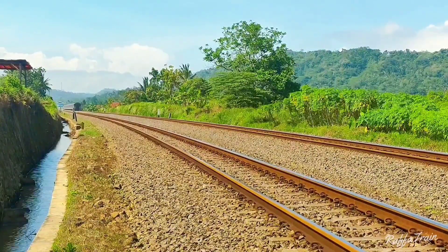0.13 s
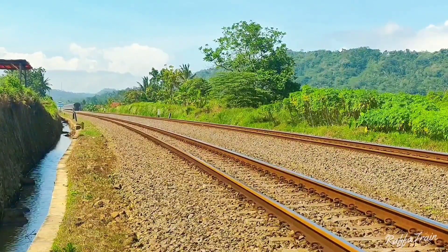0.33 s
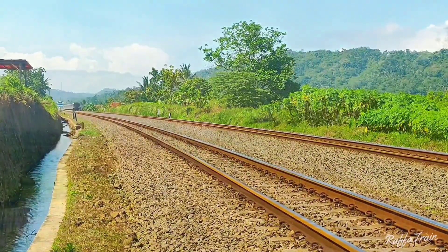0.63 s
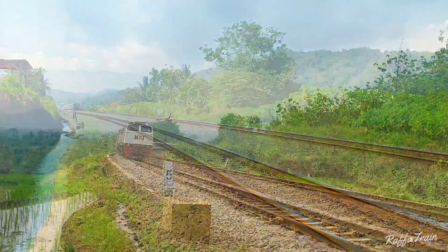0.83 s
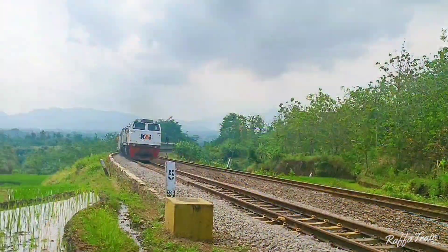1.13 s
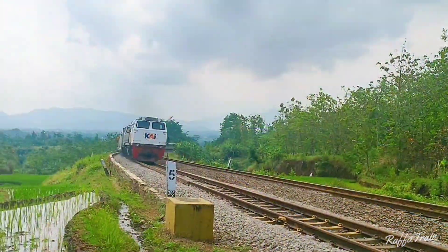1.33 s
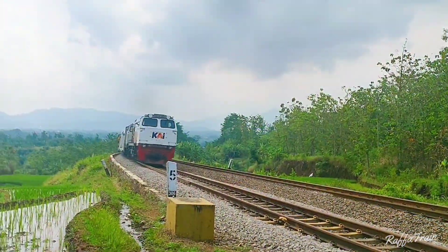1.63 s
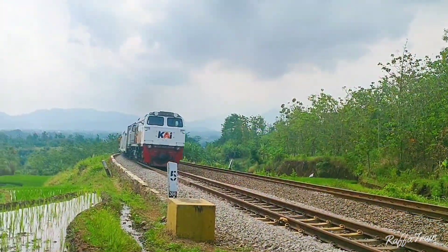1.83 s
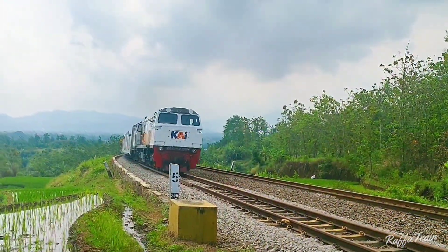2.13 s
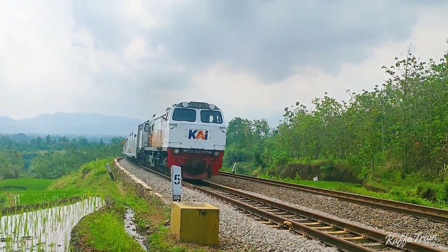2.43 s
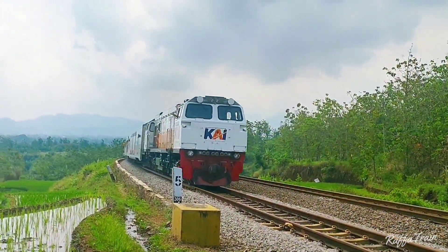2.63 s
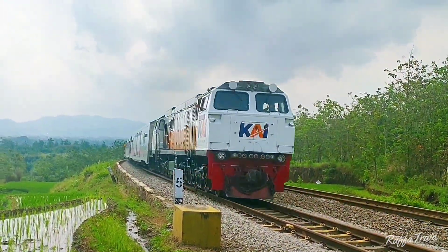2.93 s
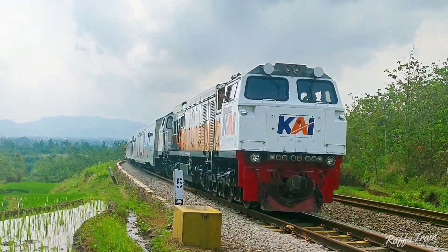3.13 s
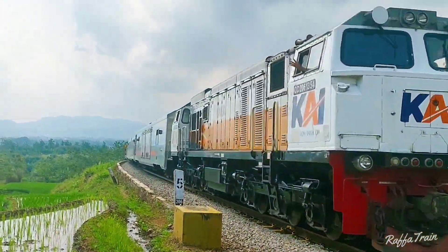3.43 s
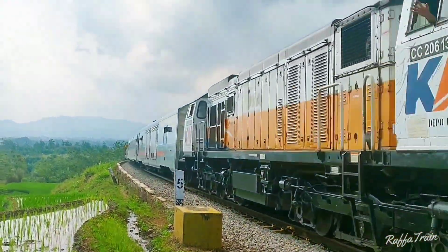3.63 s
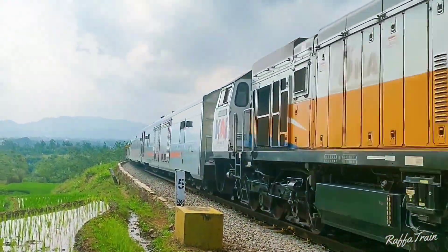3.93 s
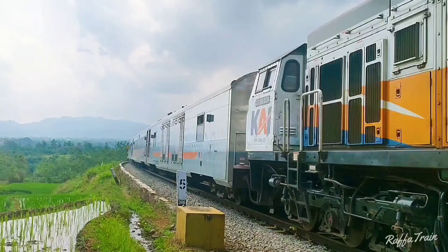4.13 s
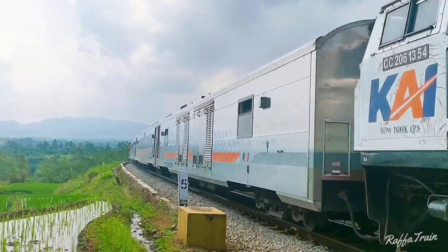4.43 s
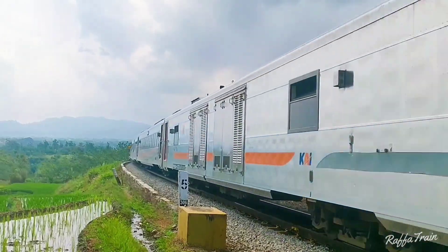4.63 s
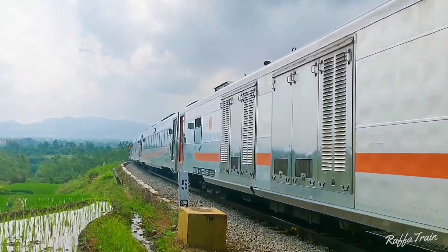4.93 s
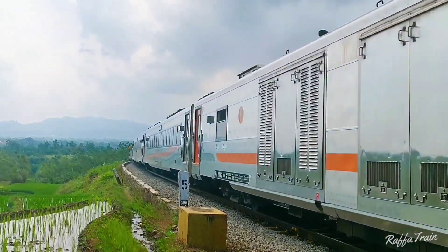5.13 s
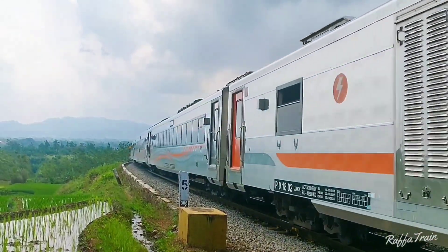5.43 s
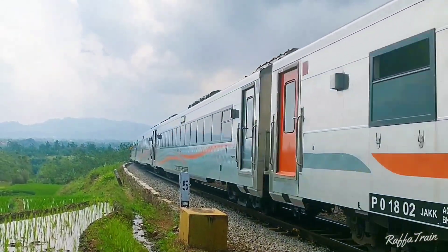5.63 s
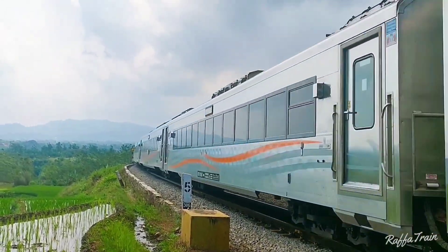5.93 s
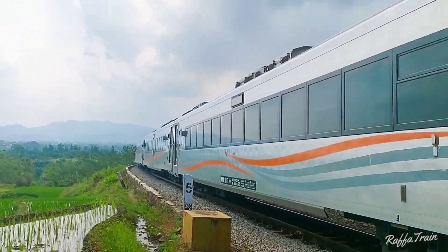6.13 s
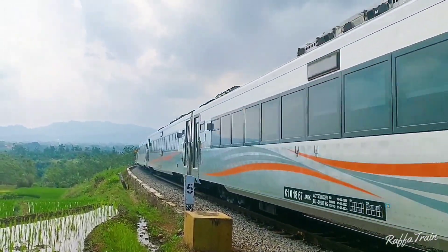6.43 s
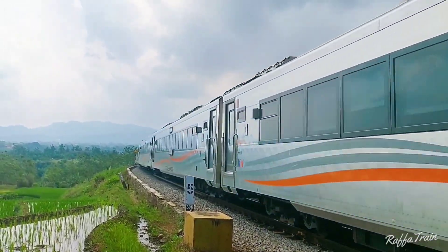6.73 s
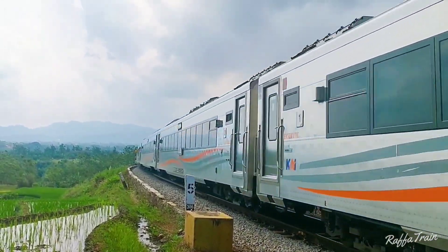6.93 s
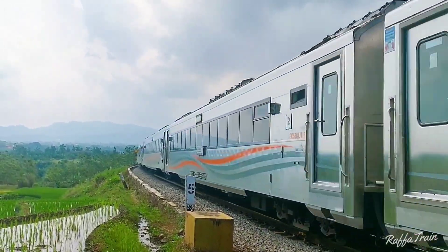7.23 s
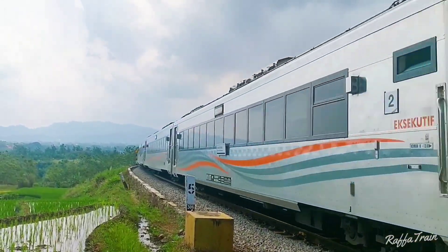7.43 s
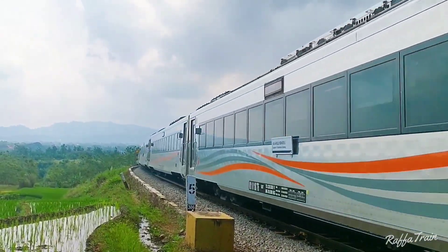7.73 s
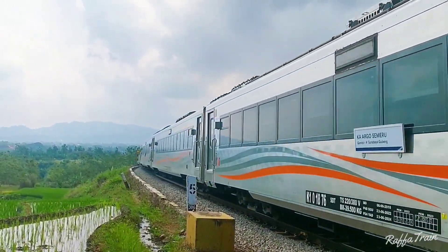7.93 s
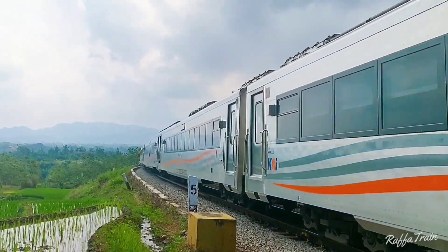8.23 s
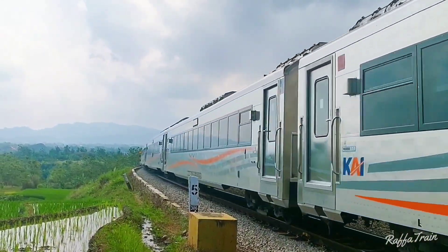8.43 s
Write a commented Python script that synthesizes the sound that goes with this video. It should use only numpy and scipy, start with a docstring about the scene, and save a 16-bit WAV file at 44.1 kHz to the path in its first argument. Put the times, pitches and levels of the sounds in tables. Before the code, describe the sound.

A diesel train sounds one two-note horn blast, throbs past up close, and its coaches clatter over rail joints.

```python
"""Diesel train on a country line

One microphone in open fields, 4.5 m from the track, with a wooded bank answering. A passenger train comes
up and sounds one blast on its two-bell air horn. The exhaust throbs and drops in pitch as it passes, the
turbocharger whistles, a generator car hums by, then the coaches roll past at close range, their wheels
knocking and clanging over the rail joints."""
import sys
import numpy as np
from scipy import signal
from scipy.fft import rfft, irfft, next_fast_len
from scipy.io import wavfile
from scipy.ndimage import uniform_filter1d, map_coordinates

SR = 44100
rng = np.random.default_rng(int(sys.argv[2]) if len(sys.argv) > 2 else 0)


def wav_out(sig):
    """Save sig, one row per channel (or a flat mono array), as 16-bit PCM at SR to the path in sys.argv[1]."""
    wavfile.write(sys.argv[1], SR, np.round(np.clip(np.atleast_2d(sig).T, -1, 1) * 32767).astype(np.int16))


N = 377937

# Noise colours: f/Hz, relative level/dB per Hz
FIELD_SPECTRUM = [(15, -43), (25, -21), (76, -1), (134, -0.5), (349, -13.5), (386, -18), (756, -9.5),
                  (2420, -23), (3300, -36), (3750, -57), (5250, -51), (5820, -37.5), (8150, -38),
                  (9270, -56), (12000, -62), (15600, -94), (22000, -120)]  # open country
RUMBLE_SPECTRUM = [(15, -45), (26, -17), (35, -12), (44, -14), (58, -9), (76, -4), (100, 1.5), (140, 12.5),
                   (190, -6), (265, 3), (330, -40), (450, -57.5)]  # ground
ROAR_SPECTRUM = [(94, -34), (160, -1.5), (178, -2), (264, -8.5), (302, -2), (889, -14), (1030, -26.5),
                 (1120, -21.5), (1600, -30.5), (2080, -29.5), (3520, -120)]  # sleepers
RAIL_SPECTRUM = [(530, -82), (900, -14), (996, 7), (1100, -8), (1280, -15), (1760, -3.5), (2100, -1),
                 (2420, -0.5), (3680, -13.5), (4500, -37), (5850, -52), (9900, -120)]  # rails
RASP_SPECTRUM = [(880, -42), (1500, -1), (1960, -14), (2430, 0), (2790, -17), (3200, -26), (4470, -33),
                 (6430, -38), (8900, -12), (10200, -35), (15700, -41)]  # air torn by the horn's diaphragms
HISS_SPECTRUM = [(2240, -2), (3800, -11), (5210, -5), (6450, 3), (6890, 3), (7570, -0.5), (8530, -0.5),
                 (9780, -8.5), (11700, -11), (12600, -18), (14900, -14), (15700, -17)]  # wheel rubbing on rail
CLANG_SPECTRUM = [(350, 7), (600, 9), (800, 17), (1240, 4.5), (1660, 6.5), (2080, 14.5), (3780, -11),
                  (4830, -3), (5300, -37.5), (5760, -29), (7000, -25), (9100, -44), (15400, -120)]  # wheel and bogie
GAS_SPECTRUM = [(40, -41), (90, -22), (130, 7), (190, 7), (270, -6.5), (340, -9.5), (800, -11),
                (2000, -86)]
DRONE_SPECTRUM = [(22, -31), (36, -10), (55, -11), (170, -20), (265, 4), (340, -20.5), (500, -9.5),
                  (750, -25), (1300, -22), (2000, -43), (5000, -54)]
SNAP_SPECTRUM = [(400, -6), (2300, -4.5), (3800, -21.5), (7000, -6), (12000, -21)]
# Exhaust tones: multiple of the cycle rate, relative level/dB
EXHAUST_ORDERS = [(3, -35), (4, -12.5), (5, -32), (6, -38), (7, -37), (8, -55), (9, -28), (10, -36),
                  (11, 3), (12, 3.5), (13, -21), (14, -9), (15, -9), (16, -6), (17, 2), (18, -8.5),
                  (19, -21), (20, -15), (21, -7), (22, -39), (23, -22), (24, -10.5), (25, -11.5),
                  (26, -11.5), (27, -24), (28, -13.5), (29, -12), (30, -15), (31, -21)]
# Exhaust at the microphone: t/s, level/dB
EXHAUST_LEVEL = [(.5, -33), (1.15, -26), (1.6, -24), (2.4, -23.5), (2.9, -21.5), (3.3, -22.5), (3.55, -26),
                 (4.45, -17.5), (4.8, -27), (5.3, -26.5), (5.8, -22.5), (7.0, -28.5), (8.57, -37)]
# Engine-room swell, on top of its change with distance: t/s, level/dB
DRONE_SWELL = [(2.4, -9.5), (3.0, -0.5), (3.45, 0), (4.0, -1.5), (4.6, -1), (5.3, 7), (5.8, -2.5)]
# Horn bells at full pressure: harmonic, relative level/dB
LOW_BELL = [(1, -30.5), (2, -24.5), (3, -29.5), (4, -25.5), (5, -36.5), (6, -42.5), (7, -44.5), (8, -34),
            (9, -49), (10, -49), (11, -56), (12, -49), (13, -57), (14, -48), (15, -51), (16, -52),
            (17, -51), (18, -48), (19, -46), (20, -43.5), (21, -43), (22, -52), (23, -52), (24, -46),
            (25, -53), (26, -46.5), (27, -48.5), (28, -49), (29, -55), (30, -55.5), (31, -62)]
HIGH_BELL = [(1, -37), (2, -28.5), (3, -34), (4, -42), (5, -42.5), (6, -51), (7, -48), (8, -54), (9, -54),
             (10, -72), (11, -53), (12, -49), (13, -46), (14, -46.5), (15, -44), (16, -56), (17, -61),
             (18, -61)]
# Course of the high bell's first partial, and lift of its third: t/s, level/dB
HIGH_FUNDAMENTAL = [(.78, -35), (1.0, -40), (1.3, -32), (1.62, -25), (1.78, -31)]
HIGH_THIRD_LIFT = [(.76, 0), (.87, 8), (.93, -14), (1.02, 2), (1.32, 2.5), (1.5, 5), (1.56, -7)]
# Colouring of the horn's rough sum and difference tones: f/Hz, level/dB
MIXING_COLOUR = [(600, -46), (1100, -16), (2500, -1), (4200, -29), (6500, 0), (8700, 1.5), (10500, -16)]
# Echo decay of the wooded bank: f/Hz, t60/s
BANK_DECAY = [(150, 0.99), (1000, 1), (8000, 0.94)]
# Flanges grazing the rail: t/s, level/dB, length/s
FLANGE_GRAZES = [(3.41, -37, 0.19), (3.808, -27, 0.0097), (4.028, -28, 0.022), (4.362, -36, 0.013),
                 (4.44, -26.5, 0.018), (5.025, -31, 0.013), (5.137, -26, 0.016), (5.17, -31.5, 0.26),
                 (5.352, -28, .014), (6.148, -31, 0.055), (6.36, -30, 0.032)]
# Wheels on joints, far ones dull, near ones clanging: t/s, knock/dB, clang/dB, knock f/Hz, length/s
JOINT_STRIKES = [(3.471, -21, -31, 504, 0.0064), (3.597, -24, -37, 263, 0.014),
                 (3.709, -26, -43, 262, 0.018), (3.928, -15.5, -52, 253, 0.018),
                 (4.185, -16, -42, 200, 0.031), (4.657, -14.5, -39, 267, 0.013),
                 (4.694, -19, -27.5, 386, 0.005), (5.124, -24, -25, 463, 0.026),
                 (5.184, -13.5, -34, 253, 0.018), (5.246, -17, -28, 234, 0.037),
                 (5.343, -21, -28.5, 480, 0.038), (5.414, -20, -43, 313, .02),
                 (5.541, -20.5, -32, 256, 0.015), (5.659, -19, -22.5, 480, 0.016),
                 (5.794, -20.5, -21.5, 450, 0.023), (5.953, -15.5, -37, 277, 0.022),
                 (6.091, -23, -42, 255, 0.032), (6.191, -14.5, -29.5, 290, 0.0092),
                 (6.335, -20.5, -31, 314, 0.024), (6.413, -14, -29.5, 295, 0.012),
                 (6.551, -15.5, -24.5, 283, 0.023), (6.645, -16.5, -44, 283, 0.01),
                 (6.71, -22, -21.5, 350, 0.02), (6.796, -16.5, -41, 383, 0.0072),
                 (7.02, -18, -24.5, 456, 0.019), (7.164, -19, -22.5, 510, 0.026),
                 (7.318, -14.5, -29, 255, 0.025), (7.464, -13.5, -35, 252, 0.02),
                 (7.563, -13.5, -34.5, 315, .014), (7.702, -16.5, -38, 288, .02),
                 (7.775, -14, -30.5, 253, 0.022), (7.929, -15.5, -25.5, 400, 0.023),
                 (8.016, -13.5, -47, 287, 0.016), (8.078, -18.5, -21, 485, 0.02),
                 (8.164, -13.5, -31, 260, 0.012), (8.388, -17, -23, 430, 0.022),
                 (8.53, -18, -21.5, 456, 0.022)]
# Modes of a steel wheel: f/Hz, relative level/dB, t60/s
WHEEL_MODES = [(514, 6, 0.12), (757, 3.5, 0.093), (1957, -0.5, 0.13), (2148, -8.5, 0.074), (2330, 2, .12),
               (2540, -9, 0.19)]

# Passing sources: abreast t/s, base level/dB, loss/dB per doubling of distance
TURBO, GEARS = (4.53, -33, 4), (4.3, -33.5, 3.5)
ENGINE_ROOM, GENERATOR = (3.98, -18, 5.2), (4.78, -25, 3.3)
# Wheel noise: arrival t/s, base level/dB, loss/dB per doubling of distance before, loss/dB per s after
RUMBLE, ROAR = (2.5, -25.5, 3.5, 1.5), (3.5, -20.5, 7, 1.07)
RAIL, HISS = (4, -32, 5, 1.38), (4.5, -29, 4.5, 2.5)

SPEED_M_PER_S, TRACK_M, SOUND_M_PER_S = 14.06, 4.5, 343
CYCLE_HZ, ENGINE_PASS_S = 8.765, 4.38  # four-stroke cycle rate; stack abreast of the microphone
LOW_HZ, HIGH_HZ = 296.5, 431.7  # the horn's bells
CATCH_S, SHUT_S, STALL_S = .745, 1.52, 1.78  # the bells catch, the valve shuts, the diaphragms stall
FILL_S, BLEED_S = .1, .088  # how slowly the horn's pipe fills and empties
ATTACK_DB_PER_S, RELEASE_DB_PER_S = 698, 99.5
HIGH_LEAD_S, HIGH_LAG_S = .024, .07  # the high bell catches first and keeps its air longer


def amp(db):
    """Decibels to gain."""
    return 10 ** (np.asarray(db) / 20)


def unit(x):
    """Scaled to rms 1."""
    return x / np.sqrt(np.mean(x ** 2) + 1e-20)


def seconds(size=N):
    """The time of each sample."""
    return np.arange(size) / SR


def along(points, hz):
    """A table read on a log frequency axis."""
    f, values = np.transpose(points)
    return np.interp(np.log(hz + 1), np.log(f + 1), values)


def curve(points, size=N):
    """A table over time, read at every sample."""
    return np.interp(seconds(size), *np.transpose(points))


def wobble(rate, size=N):
    """A smooth random curve, rate knots a second."""
    coarse = np.arange(0, size + 16, 16)
    knots = rng.standard_normal(int(size * rate / SR) + 4)
    return np.interp(np.arange(size), coarse, map_coordinates(knots, [coarse * rate / SR]))


def filtered(x, response):
    """x through a response given as gain against frequency."""
    m = next_fast_len(len(x) + SR // 5)
    return irfft(rfft(x, m) * response(np.fft.rfftfreq(m, 1 / SR)), m)[:len(x)]


def noise(spectrum, size=N, patchy_db=0):
    """Coloured noise of rms 1, with optional patches of random gain in time and frequency."""
    white = rng.standard_normal(size)
    if patchy_db:
        z = signal.stft(white, nperseg=512)[2]
        patches = uniform_filter1d(uniform_filter1d(rng.standard_normal(z.shape), 4, 0), 10, 1)
        white = signal.istft(z * amp(patchy_db * unit(patches)), nperseg=512)[1][:size]
    return unit(filtered(white, lambda hz: amp(along(spectrum, hz))))


def phase_of(hz):
    """Running phase of a moving frequency."""
    return 2 * np.pi * np.cumsum(hz) / SR


def blow(t, rise, t60, hold=0):
    """A swell, a short hold and an exponential fall, peak 1."""
    rise = max(rise, .002)
    return np.minimum(t / rise, 1) * amp(-60 * np.maximum(t - rise - hold, 0) / t60)


def distance(abreast_s):
    """Metres from the microphone to a point of the train."""
    return np.hypot(TRACK_M, SPEED_M_PER_S * (seconds() - abreast_s))


def doppler(abreast_s):
    """Pitch ratio at the microphone: high coming, low leaving."""
    return 1 / (1 + np.gradient(distance(abreast_s)) * SR / SOUND_M_PER_S)


def passing(abreast_s, db, fall_db):
    """Level in dB of one source going by the microphone."""
    return db - fall_db * np.log2(distance(abreast_s) / TRACK_M)


def procession(arrive_s, db, fall_db, ease_db):
    """Level in dB of the row of wheels: it grows as the first ones near, then eases along the coaches."""
    since = seconds() - arrive_s
    return np.where(since < 0, passing(arrive_s, db, fall_db), db - ease_db * since)


def lull(first_s=5.58, coach_s=1.36, width_s=.095):
    """1 during a brief dip in the rolling noise, once per coach, just before a pair of clangs."""
    since = seconds() - first_s
    offset = since - coach_s * np.maximum(np.round(since / coach_s), 0)
    return np.exp(-(2 * offset / width_s) ** 2)


def open_country(db=-49.5):
    """The faint, steady rush of the fields around the microphone."""
    return amp(db) * noise(FIELD_SPECTRUM, patchy_db=3.5)


def exhaust():
    """Unequal cylinders repeat each cycle: a comb of tones and puffs of gas from the stack."""
    level_db = curve(EXHAUST_LEVEL)
    phase = phase_of(CYCLE_HZ * doppler(ENGINE_PASS_S) * (1 + .001 * wobble(12)))
    drift = [wobble(4) for _ in range(7)]  # the air path shifts the balance of the orders
    orders = sum(amp(db + 1.1 * drift[i % 7]) * np.sin(order * phase + rng.uniform(0, 2 * np.pi))
                 for i, (order, db) in enumerate(EXHAUST_ORDERS))
    puffs = unit(noise(GAS_SPECTRUM) * (1 + 1.25 * np.cos(4 * phase)) * (1 + .5 * np.cos(phase)))
    throb = 1 + .25 * np.cos(phase) + .28 * np.cos(4 * phase)
    return amp(level_db + .8 * wobble(14)) * unit((unit(orders) + amp(-12.5) * puffs) * throb)


def engine_room():
    """Engine and radiator fans drone through the louvres, throbbing with the cylinders."""
    drone = noise(DRONE_SPECTRUM, patchy_db=2)
    throb = 1 + .29 * np.cos(4 * phase_of(CYCLE_HZ * doppler(ENGINE_PASS_S)))
    return amp(passing(*ENGINE_ROOM) + curve(DRONE_SWELL)) * unit(drone * throb)


def rolling(knee_hz=450, near_s=4.5, dull_db_per_s=2):
    """Rough treads shake ground, sleepers and rails; loose gear makes the upper bands chatter together."""
    chatter = wobble(70)
    rumble = amp(procession(*RUMBLE) + 1.6 * wobble(12) - 7 * lull()) * noise(RUMBLE_SPECTRUM)
    roar_db = procession(*ROAR) + 1.54 * chatter + .73 * wobble(13) - 3.5 * lull()
    roar = amp(roar_db) * noise(ROAR_SPECTRUM, patchy_db=1.5)
    upper = filtered(roar, lambda hz: 1 - 1 / (1 + (hz / knee_hz) ** 4))
    upper_gain = amp(-dull_db_per_s * np.maximum(near_s - seconds(), 0))  # muffled at a distance
    roar += upper * (upper_gain - 1)
    rail_db = procession(*RAIL) + chatter + .67 * wobble(12) - 1.5 * lull()
    return rumble + roar + amp(rail_db) * noise(RAIL_SPECTRUM, patchy_db=2)


def bell(hz, harmonics, knee, tilt_db, gain_db, lifts_db, rasp_db):
    """One horn bell: a buzzing diaphragm whose overtones above the knee fade first as pressure falls."""
    size = len(hz)
    beat_hz = (3 * LOW_HZ - 2 * HIGH_HZ) * (1.025 + .025 * wobble(10, size))
    beat = np.cos(phase_of(beat_hz))  # the mistuned fifth shakes pitch and overtones
    phase = phase_of(hz * (1 + .0018 * beat + .0028 * wobble(200, size) + .001 * wobble(25, size)))
    # the air path to the microphone makes the partials waver
    flutter = [wobble(11, size) + .7 * wobble(70, size) + .5 * wobble(260, size) for _ in range(7)]
    tone = np.zeros(size)
    for i, (harmonic, db) in enumerate(harmonics):
        octaves = max(np.log2(harmonic / knee), 0)
        shake_db = 1.97 * (.7 + .2 * octaves) * flutter[i % 7] + .9 * octaves * beat
        partial_db = db + lifts_db.get(harmonic, 0) + tilt_db * min(octaves, 2) + shake_db
        tone += amp(partial_db) * np.sin(harmonic * phase + rng.normal(0, .6))
    opening = (1 + np.cos(phase)) ** 3  # air escapes once a cycle
    puffs = unit(noise(RASP_SPECTRUM, size) * opening * (1 + .25 * beat))
    return amp(gain_db) * (np.sqrt(2) * tone + amp(rasp_db + 2 * tilt_db) * puffs)


def horn(length_s=2.3, mixing_db=-21, squeak_s=.694):
    """Two bells on one valve, far up the line: a rough fifth, heard with sum and difference tones."""
    size = int(length_s * SR)
    t = seconds(size)
    blown_s = np.maximum(t - CATCH_S, 0)
    pressure = (1 - .22 * np.exp(-blown_s / FILL_S)) / (1 + np.exp((t - SHUT_S) / BLEED_S))
    release_db = RELEASE_DB_PER_S * np.maximum(t - STALL_S, 0)
    gate_db = lambda lead_s: ATTACK_DB_PER_S * np.minimum(t - CATCH_S + lead_s, 0) - release_db
    tilt_db = -14 * (1 - pressure)  # per octave
    # the pitch starts high, settles, then creeps sharp
    bend = 1 + .014 * np.exp(-blown_s / .04) + .006 * (t - (CATCH_S + SHUT_S) / 2)
    sizzle = [(harmonic, -70) for harmonic in range(32, 52)]
    build_db = 1.5 - 8.5 * np.exp(-blown_s / .13)
    low = bell(LOW_HZ * bend, list(LOW_BELL) + sizzle, knee=1.85, tilt_db=tilt_db,
               gain_db=gate_db(0) - 1.24, lifts_db={1: build_db, 2: build_db}, rasp_db=-46)
    high_lifts_db = {1: curve(HIGH_FUNDAMENTAL, size) - HIGH_BELL[0][1], 3: curve(HIGH_THIRD_LIFT, size)}
    high = bell(HIGH_HZ * bend, HIGH_BELL, knee=1.52, tilt_db=np.interp(t - HIGH_LAG_S, t, tilt_db),
                gain_db=gate_db(HIGH_LEAD_S) - 1, lifts_db=high_lifts_db, rasp_db=-47)
    chord = low + high
    mixed = filtered(pressure * low * high * chord, lambda hz: amp(along(MIXING_COLOUR, hz)))
    squeak_phase = phase_of(4 * LOW_HZ * bend * 1.012)  # a diaphragm squeals just before it catches
    spike = amp(-280 * np.abs(t - squeak_s))
    squeak = amp(-34.5) * (spike * np.sin(squeak_phase) + spike ** 2 * np.sin(2 * squeak_phase))
    return np.pad(chord + amp(mixing_db) * np.std(chord) * unit(mixed) + squeak, (0, N - size))


def bank_echo(x):
    """The wooded bank scatters a late answer back to the microphone."""
    hz, t, z = signal.stft(rng.standard_normal(SR), SR, nperseg=256)
    tail = signal.istft(z * amp(-60 * t / along(BANK_DECAY, hz)[:, None]), SR, nperseg=256)[1]
    return signal.fftconvolve(np.pad(x, (SR // 40, 0)), tail / np.linalg.norm(tail))[:N]


def rubbing(tick_db=-12, ticks_per_s=90):
    """Treads and flanges hiss and crush grit; the air swallows the top octave while the train is far."""
    graze_power = sum(amp(db) ** 2 * np.exp(-(2 * (seconds() - s) / length) ** 2)
                      for s, db, length in FLANGE_GRAZES)
    gain = np.sqrt(amp(procession(*HISS) - 1.5 * lull()) ** 2 + graze_power)
    hiss = noise(HISS_SPECTRUM, patchy_db=2.5) * amp(1.14 * wobble(60) + .4 * wobble(12))
    grit = (rng.random(N) < ticks_per_s / SR) * rng.random(N) ** 3
    crush = signal.fftconvolve(grit, blow(seconds(SR // 20), rise=.002, t60=.074))[:N]
    sound = hiss + amp(tick_db) * unit(crush * noise(HISS_SPECTRUM))
    top = filtered(sound, lambda hz: np.clip((hz - 8500) / 2000, 0, 1))
    nearness = (gain / amp(-25.5)) ** .59
    return gain * (sound + (nearness - 1) * top)


def turbocharger(hz=6960, air_db_per_m=.7):
    """A high whistle that the air absorbs, so it carries only at close range."""
    level_db = passing(*TURBO) - air_db_per_m * (distance(TURBO[0]) - TRACK_M) + 1.5 * wobble(28)
    return amp(level_db) * np.sin(phase_of(hz * doppler(TURBO[0]) * (1 + .005 * wobble(400))))


def gears(hz=1030, open_s=3.7, screen_db_per_s=14):
    """Gear whine, screened from the microphone by the locomotive's nose until open_s."""
    level_db = passing(*GEARS) - screen_db_per_s * np.maximum(open_s - seconds(), 0) + 2 * wobble(16)
    return amp(level_db) * np.sin(phase_of(hz * doppler(ENGINE_PASS_S) * (1 + .012 * wobble(140))))


def sleeper_knock(t, hz, length, q=3.52):
    """The heavy knock of a sleeper resonating under an axle."""
    width = 2 * hz / q
    resonance = lambda f: (1j * f * width / (hz * hz - f * f + 1j * f * width)) ** 2
    ring = signal.hilbert(filtered(rng.standard_normal(len(t)), resonance))
    ring = unit(ring.real / np.abs(ring) ** .7)  # a flatter envelope makes each knock full and even
    ring = unit(filtered(ring, lambda f: np.clip((f - 60) / 100, 0, 1)))  # high-pass keeps deep bass out
    return ring * blow(t, rise=.4 * length, t60=.12, hold=length)


def wheel_ring(t, length, bounces=3):
    """The wheel snaps onto the rail end and chatters; each contact rings its steel modes."""
    ring = sum(amp(db + rng.normal(0, 3) - 60 * t / t60) * np.sin(2 * np.pi * hz * rng.normal(1, .015) * t)
               for hz, db, t60 in WHEEL_MODES)
    ring /= np.std(ring[:SR // 50]) + 1e-9
    snap = noise(SNAP_SPECTRUM, len(t)) * amp(-60 * t / .014)
    contacts = np.zeros(len(t))
    contact_s = length * (.25 + np.r_[0, rng.uniform(.3, 1.8, bounces)])
    contacts[(contact_s * SR).astype(int)] = np.r_[.8, rng.uniform(.4, .9, bounces)]
    return signal.fftconvolve(contacts, amp(-4.5) * ring + amp(-.5) * snap)[:len(t)]


def rail_joints():
    """Each axle drops into a rail gap: a knock, a rattle of wheel and bogie, a steel ring, a scrape."""
    track, t = np.zeros(N + SR), seconds(SR // 2)
    for s, knock_db, clang_db, hz, length in JOINT_STRIKES:
        scrape = noise(HISS_SPECTRUM, len(t)) * blow(t, rise=.056, t60=.66)
        knock = sleeper_knock(t, hz, length)
        rattle = noise(CLANG_SPECTRUM, len(t)) * blow(t, rise=.37 * length, t60=14 * length, hold=length)
        clang = amp(-1.5) * rattle + wheel_ring(t, length) + amp(-8) * scrape
        track[round(s * SR):][:len(t)] += amp(knock_db) * knock + amp(clang_db) * clang
    return track[:N]


def generator(firing_hz=148.2, louvres_s=4.82, beam_s=.5, beam_db=12.5):
    """A diesel set hums at three firings a turn, loudest while its louvres face the microphone."""
    phase = phase_of(firing_hz * doppler(GENERATOR[0]) * (1 + .0067 * wobble(25)))
    hum = np.sin(phase) + amp(-22) * (np.sin(phase / 3) + np.sin(2 * phase))
    facing = 1 / (1 + np.abs(2 * (seconds() - louvres_s) / beam_s) ** 12)
    screened_db = -30 * np.clip(louvres_s - beam_s / 2 - seconds(), 0, 1)  # behind the locomotive at first
    return amp(passing(*GENERATOR) + beam_db * facing + screened_db + wobble(20)) * unit(hum)


def scene(fade_in_s=.45, fade_length_s=.54):
    """From the lineside, in mono: the train fades in over the fields; the bank echoes horn and joints."""
    blast, clatter = horn(), rail_joints()
    echo = bank_echo(amp(-19) * blast + amp(-18) * clatter)
    fade = np.clip((seconds() - fade_in_s) / fade_length_s, 0, 1)
    diesel = exhaust() + turbocharger() + gears()
    train = np.sqrt(fade) * diesel + fade * (engine_room() + generator() + rolling() + rubbing())
    return (blast + clatter + echo + train + open_country())[None]


def record(dry, ceiling=.64, top_hz=15600):
    """The recorder behind the microphone rounds off the highest peaks and keeps nothing above top_hz."""
    rounded = dry / (1 + np.abs(dry / ceiling) ** 6) ** (1 / 6)
    return np.array([filtered(channel, lambda hz: hz < top_hz) for channel in rounded])


dry = scene()
out = record(dry)
wav_out(out)
```